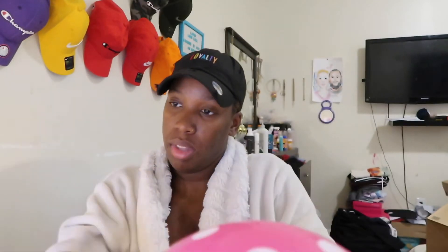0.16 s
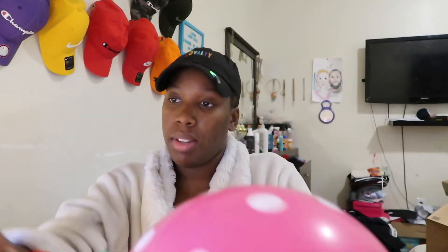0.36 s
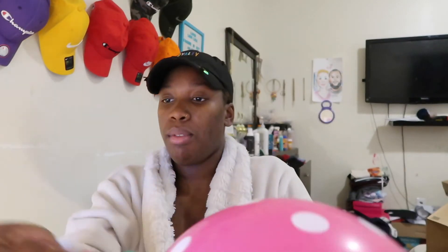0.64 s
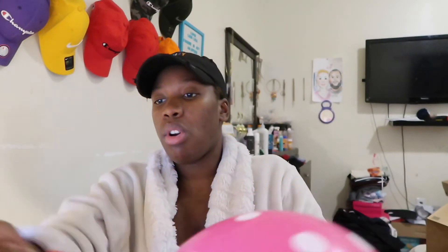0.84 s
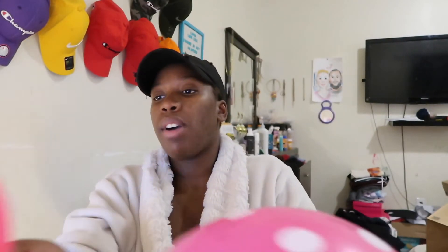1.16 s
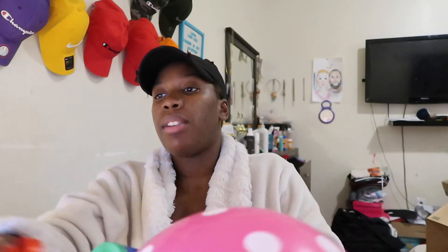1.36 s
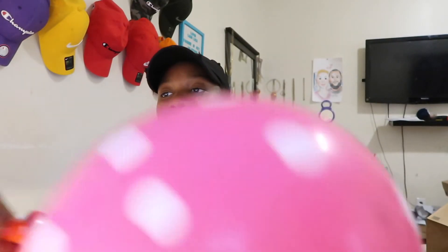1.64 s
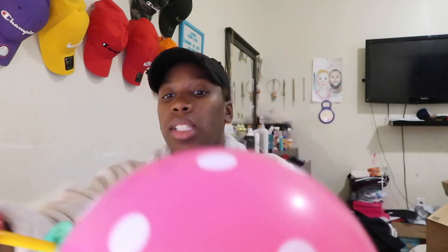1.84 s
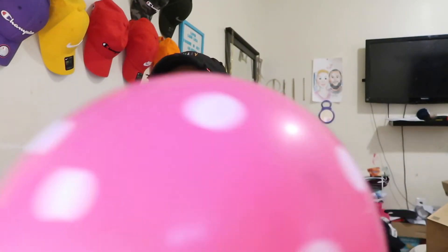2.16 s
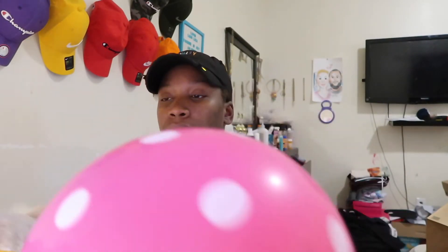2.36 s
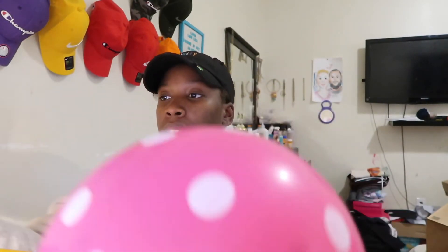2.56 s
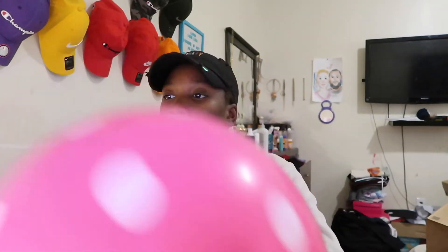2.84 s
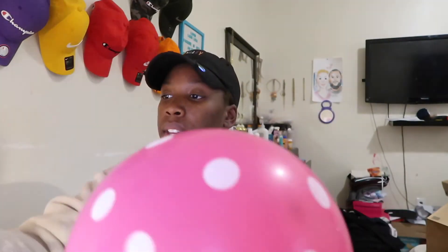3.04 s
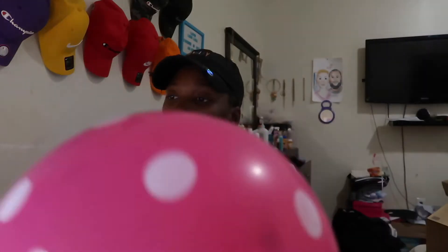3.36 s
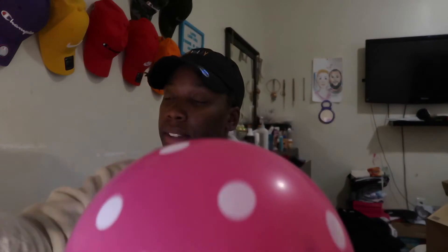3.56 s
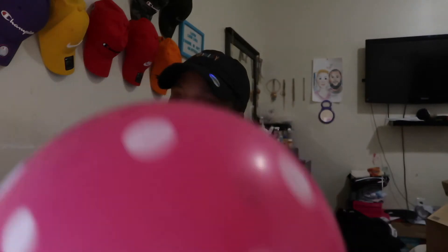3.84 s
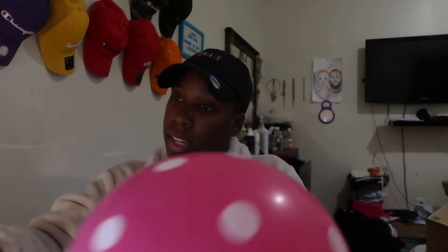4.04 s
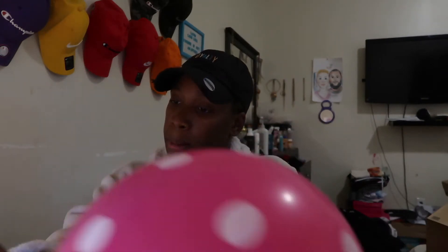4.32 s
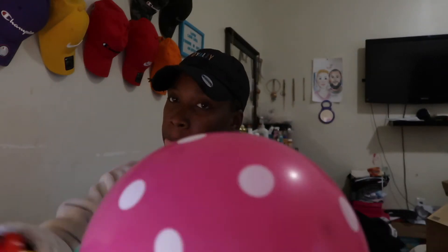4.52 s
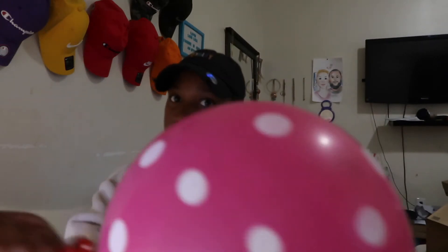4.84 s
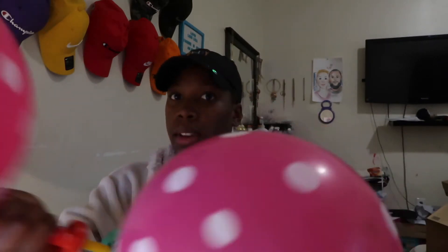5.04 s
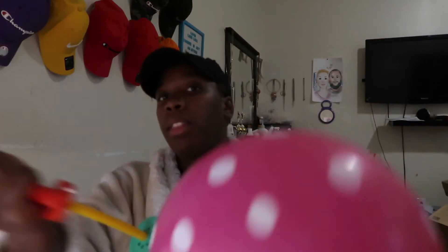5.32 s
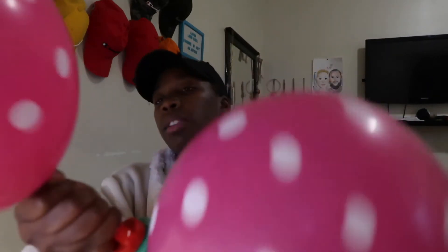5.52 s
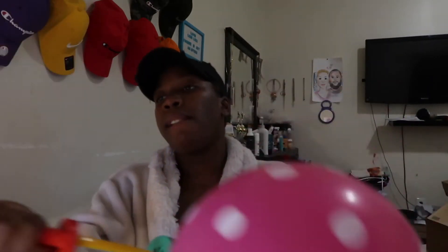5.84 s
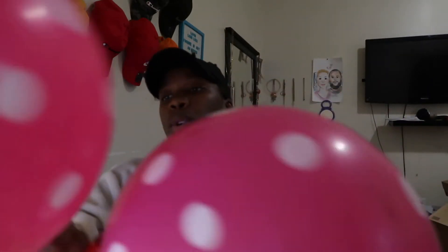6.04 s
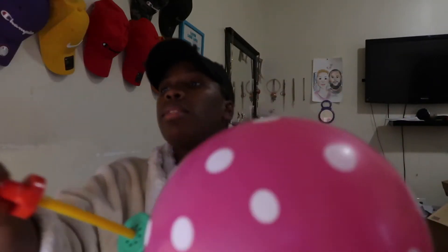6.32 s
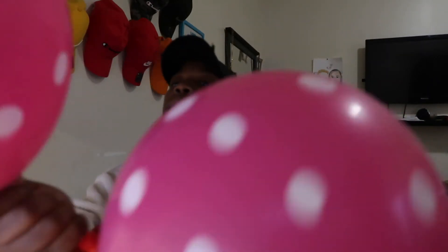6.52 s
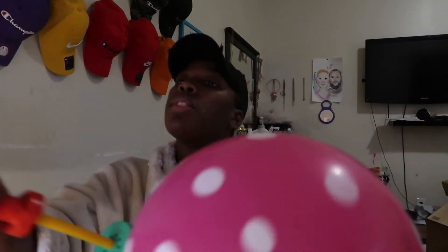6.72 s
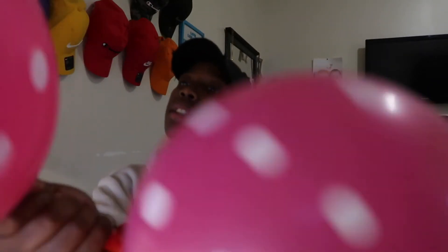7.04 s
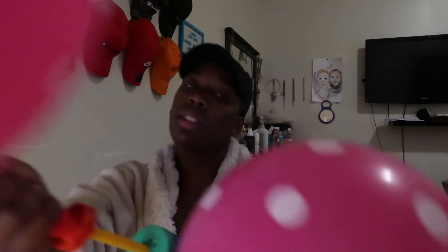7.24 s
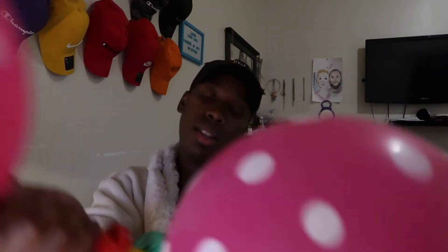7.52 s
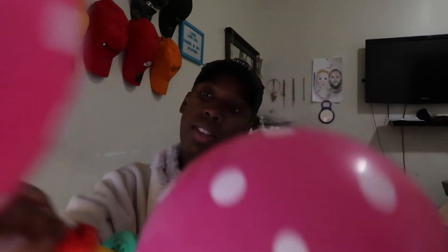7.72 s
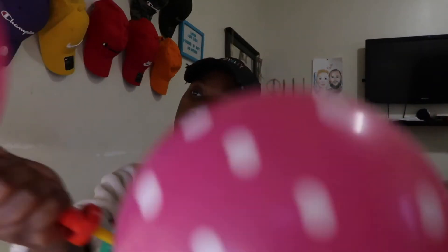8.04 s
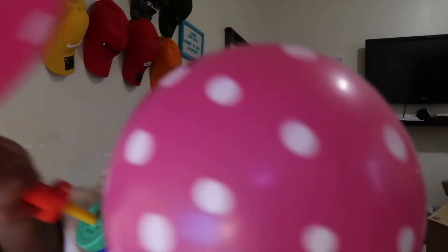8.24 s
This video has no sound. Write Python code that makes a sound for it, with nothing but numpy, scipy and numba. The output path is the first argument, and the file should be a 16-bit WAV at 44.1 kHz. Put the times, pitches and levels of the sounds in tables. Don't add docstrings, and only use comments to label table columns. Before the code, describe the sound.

Quick even pump strokes push rasping air into a balloon, each ending in a hollow plastic thump and a valve clack, indoors.

```python
import sys
import numpy as np
from scipy import signal
from scipy.fft import rfft, irfft, next_fast_len
from scipy.io import wavfile
from scipy.ndimage import uniform_filter1d
from numba import njit

SR = 44100
rng = np.random.default_rng(int(sys.argv[2]) if len(sys.argv) > 2 else 0)


def unload_audio(sound):
    columns = np.transpose(np.atleast_2d(sound))
    steps = np.round(np.clip(columns, -1, 1) * 32767)
    wavfile.write(sys.argv[1], SR, steps.astype(np.int16))


def voltage_ratio(decibels):
    exponent = np.asarray(decibels, float) / 20
    return 10 ** exponent


N = 369558
SIZE = next_fast_len(N + SR)
HZ = np.arange(SIZE // 2 + 1) * SR / SIZE
TIME = np.arange(N) / SR

# (valve flap [s], piston stop [s], hiss [dB], flap [dB], thump [dB])
PUSH_STROKES = [(0.091, 0.255, -23, -19.5, -13), (0.572, 0.739, -22, -15, -14),
                (1.043, 1.216, -22.5, -19.5, -13.5), (1.544, 1.71, -22.5, -15.5, -12.5),
                (2.055, 2.232, -24, -17.5, -14), (2.578, 2.75, -24.5, -16.5, -13),
                (3.117, 3.295, -25.5, -16.5, -14.5), (3.65, 3.837, -26, -18, -13),
                (4.208, 4.41, -25, -14.5, -21), (4.739, 4.923, -24, -19, -14),
                (5.313, 5.494, -22.5, -18, -14.5), (5.85, 6.03, -24, -19.5, -15.5),
                (6.359, 6.522, -21, -23, -14.5), (6.883, 7.054, -22, -22, -13),
                (7.431, 7.617, -22, -23, -14), (7.963, 8.142, -23.5, -17, -15.5)]
# (valve flap [s], end of travel [s], hiss [dB], flap [dB], flap ring [Hz])
PULL_STROKES = [(-0.17, 0.044, -31, -16, 1110), (0.327, 0.524, -28, -14, 1120),
                (0.796, 0.993, -25.5, -18, 985), (1.292, 1.489, -27.5, -16.5, 1150),
                (1.792, 1.998, -28.5, -14, 1190), (2.288, 2.508, -30, -15, 960),
                (2.827, 3.046, -30.5, -15.5, 1130), (3.36, 3.571, -28, -16.5, 980),
                (3.928, 4.14, -27.5, -14.5, 1110), (4.454, 4.668, -29, -15, 945),
                (5.015, 5.236, -27.5, -15.5, 1014), (5.577, 5.781, -26.5, -17, 1090),
                (6.091, 6.296, -28.5, -18.5, 1100), (6.615, 6.82, -27, -15.5, 1136),
                (7.152, 7.36, -23.5, -12.5, 1110), (7.696, 7.904, -26.5, -14, 1100),
                (8.209, 8.404, -26.5, -13, 1120)]
# (frequency [Hz], level [dB], t60 [s])
BALLOON_MODES = [(87, -21, 0.46), (127.3, -10.5, 0.34), (195.2, -3, 0.078), (278, -12, .12)]


def along(table):
    hz, value = np.transpose(table)
    return np.interp(np.log(HZ + 1), np.log(hz + 1), value)


def shape(x, gain):
    return irfft(rfft(x, SIZE) * gain, SIZE)[..., :N]


def unit(x):
    return x / np.sqrt(np.mean(x ** 2))


def noise():
    return rng.standard_normal(N)


def walk(rate):
    hold = int(SR / rate)
    levels = np.repeat(rng.standard_normal(N // hold + 1), hold)
    return 1.29 * uniform_filter1d(levels, hold)[:N]


def bump(start_s, length_s):
    return np.sin(np.pi * np.clip((TIME - start_s) / length_s, 0, 1)) ** 2


def add(out, s, x):
    i = int(s * SR)
    out[i:i + len(x)] += x[:N - i]


@njit
def svf(x, hz, width):
    y, band, low = np.empty(len(x)), 0., 0.
    for i in range(len(x)):
        g, k = np.tan(np.pi * hz[i] / SR), width / hz[i]
        v = (band + g * (x[i] - low)) / (1 + g * (g + k))
        band, low, y[i] = 2 * v - band, low + 2 * g * v, k * v
    return y


def ring(modes, contact_s, scatter_db=1.77, detune=0.035):
    t = TIME[:int(SR * max(t60 for _, _, t60 in modes))]
    chance = rng.standard_normal((len(modes), 2))
    out = np.zeros(len(t))
    for k, ((hz, db, t60), (louder, sharper)) in enumerate(zip(modes, chance)):
        phase = np.pi / 2 * (k % 2)
        decay = voltage_ratio(db + scatter_db * louder - 60 * t / t60)
        out += decay * np.sin(2 * np.pi * hz * (1 + detune * sharper) * t + phase)
    push = np.hanning(int(contact_s * SR) + 3)
    return np.convolve(out, push / push.sum())


def flow(strokes, rule):
    jet = np.zeros(N)
    lag_s, swell_s, fade_db, typical_db, overrun_s = rule
    for flap, end, db in strokes:
        start, stop = flap + lag_s, end + overrun_s
        full = start + swell_s
        t = TIME[max(int(start * SR), 0):int((stop + .02) * SR)]
        swell = np.sin(np.pi / 2 * np.clip((t - start) / (full - start), 0, 1)) ** 1.57
        fade = fade_db - 0.6 * (db - typical_db)
        sag = voltage_ratio(db + fade * np.clip((t - full) / (stop - full), 0, 1) ** 2)
        cut = np.clip((stop - t) / 0.0078 + .5, 0, 1)
        add(jet, max(start, 0), swell * sag * cut)
    return jet, jet * voltage_ratio(2 - 0.3946 * TIME)


def hiss(flows, column, jet_db, column_db, boom_db):
    # (frequency [Hz], density [dB per Hz])
    jet_spectrum = [(200, -15.5), (800, -10.5), (2000, -6.5), (4500, -5.5), (6000, -4.5), (7500, -2),
                    (10000, -3), (12500, -8), (14500, -13), (16000, -32)]
    skin_tilt_db = (3, 3.5, -5, 0)
    jet, barrel = flows
    eddies = voltage_ratio(1.37 * walk(150) + 0.58 * walk(30))
    air = unit(shape(noise(), voltage_ratio(along(jet_spectrum)))) * jet * eddies * voltage_ratio(jet_db)
    for hz, width, db in column:
        centre = hz * (1 + 0.038 * walk(8))
        tone = unit(svf(noise(), centre, width * 1.)) * voltage_ratio(db + 2.0 * walk(25))
        air += tone * barrel * eddies * voltage_ratio(column_db)
    shake = noise() * barrel * voltage_ratio(4.5 * walk(12))
    skin = np.zeros(N)
    for (hz, db, _), tilt_db in zip(BALLOON_MODES, skin_tilt_db):
        skin += voltage_ratio(db + tilt_db) * svf(shake, hz * (1 + 0.092 * walk(4)), 20.8)
    return air + skin * voltage_ratio(boom_db)


def push_hiss():
    # (start after flap [s], swell [s], fade at typical level [dB], typical level [dB], run past stop [s])
    rule = (0.004, 0.1069, -7, -20, 0.02)
    # (frequency [Hz], width [Hz], level [dB])
    column = [(1290, 140, -8.5), (1662, 220, -2.5), (2270, 200, -3.5), (2710, 260, -2), (3410, 200, 1.5),
              (4090, 300, -1.5)]
    strokes = []
    for flap, stop, db, _, thump_db in PUSH_STROKES:
        early_s = 0.006 * min(thump_db + 14, 0)
        strokes.append((flap, stop + early_s, db))
    return hiss(flow(strokes, rule), column, 0.69, -12.5, 11.4)


def pull_hiss():
    # (start after flap [s], swell [s], fade at typical level [dB], typical level [dB], run past stop [s])
    rule = (0.0059, 0.0842, -6.5, -27.5, 0.0108)
    # (frequency [Hz], width [Hz], level [dB])
    column = [(840, 270, -5.5), (1294, 150, -3), (1633, 230, -1.5), (2196, 260, -4), (2710, 240, -1),
              (3390, 300, -2.5)]
    strokes = [row[:3] for row in PULL_STROKES]
    return hiss(flow(strokes, rule), column, 0.56, -10.0, 10.7)


def spurts():
    size = np.zeros(N)
    for flap, _, db, *_ in PUSH_STROKES:
        size += voltage_ratio(db - 21.5) * bump(flap + 0.011, 0.053)
    fizz = shape(noise(), 1 / (1 + (10800 / (HZ + 1)) ** 12))
    return unit(fizz) * size * np.array([[1], [-1]])


def stops(hits, boom_db, knock_db, handle_db):
    # (frequency [Hz], level [dB], t60 [s])
    barrel = [(376.3, -2, 0.077), (448, -0.5, 0.032), (582, 0.5, 0.022), (638, -7.5, 0.019),
              (970, -19, 0.016), (1284, -18, .05)]
    crack = [(2010, -2, 0.0075), (2770, 1, 0.0087), (3530, 1, 0.012), (4500, -5, 0.0053)]
    handle = [(1263, 0, 0.074), (1330, -9.5, .03)]
    out = np.zeros(N)
    for s, db, crack_db in hits:
        add(out, s + 0.0012, voltage_ratio(db + boom_db) * ring(BALLOON_MODES, 0.0016, scatter_db=2.0, detune=0.062))
        add(out, s + 0.00095, voltage_ratio(db + knock_db) * ring(barrel, 0.00053))
        add(out, s + .0005, voltage_ratio(db + crack_db + 4.5) * ring(crack, .0001, detune=0.068))
        add(out, s + 0.00144, voltage_ratio(db + crack_db + handle_db) * ring(handle, 0.00015, detune=0.0095))
        add(out, s + .012, voltage_ratio(db + crack_db - 9.5) * ring(crack, .0001, detune=0.082))
    return out


def push_stops():
    cracks_db = -8 + 1.5 * rng.standard_normal(len(PUSH_STROKES))
    hits = [(row[1], row[4], db) for row, db in zip(PUSH_STROKES, cracks_db)]
    return stops(hits, -3, -1.9, -7.5)


def pull_stops():
    # (time [s], thump [dB], crack [dB])
    hits = [
        (0.018, -18.5, -2),
        (0.988, -20, -2.5),
        (2.518, -23, -9),
        (3.042, -20, 0),
        (3.569, -20, -2.5),
        (4.166, -25.5, -9),
        (4.702, -31, -8),
        (5.226, -20.5, 6),
    ]
    return stops(hits, 0.46, -4.5, -4)


def flaps(turns, chamber, t60, bounce_s, lift_db, tick_db, bounce_db):
    # (frequency [Hz], level [dB], t60 [s])
    tick = [(1800, -1, 0.005), (2430, 1.5, 0.0079), (3180, -6, 0.0056)]
    out = np.zeros(N)
    for s, db, hz in turns:
        modes = [(hz, 0, t60)] + chamber
        add(out, s - .007, voltage_ratio(db + lift_db) * ring(tick, .0001, detune=.08))
        add(out, s + 0.001014, voltage_ratio(db + tick_db) * ring(tick, .0001))
        add(out, s + 0.001003, voltage_ratio(db - 3) * ring(modes, 0.0003, detune=0.032))
        add(out, s + .001 + bounce_s, voltage_ratio(db + bounce_db) * ring(modes, 0.00049, detune=0.02))
    return out


def flaps_after_push():
    # (frequency [Hz], level [dB], t60 [s])
    chamber = [(280, -12.5, 0.019), (472, -8.5, 0.02), (666, -3, 0.04), (1196, -6, 0.025),
               (1670, -14, .012)]
    turns = [(row[0], row[3], row[4]) for row in PULL_STROKES[1:]]
    return flaps(turns, chamber, 0.026, .0036, -34, -18, -7)


def flaps_after_pull():
    # (frequency [Hz], level [dB], t60 [s])
    chamber = [(287, -10.5, 0.016), (480, -9, 0.013), (736, -4, 0.011), (1150, -4.5, 0.021),
               (1600, -8.5, 0.014), (2210, -4.5, 0.016)]
    turns = [(row[0], row[3], 610) for row in PUSH_STROKES]
    return flaps(turns, chamber, 0.027, 0.00361, -15, -5.5, -10.5)


def rubs():
    # (time [s], length [s], level [dB])
    drags = [
        (0.15, 0.11, -34),
        (0.66, 0.089, -37),
        (1.127, 0.12, -38),
        (2.68, 0.088, -35),
        (5.62, 0.12, -46),
        (7.113, 0.24, -34.5),
        (7.52, 0.093, -39),
    ]
    size = sum(voltage_ratio(db) * bump(s, length) for s, length, db in drags)
    skin = sum(svf(noise(), hz * (1 + 0.069 * walk(9)), hz / 4) for hz in (135., 175., 270.))
    return unit(skin) * size * voltage_ratio(3.2 * walk(25))


def room(x, t60_low, t60_high, wet_db):
    # (frequency [Hz], level [dB])
    unshared = [(100, -60), (200, -26), (500, -15.5), (1500, -27.5), (3000, -3), (5000, 4.5), (16000, -23)]
    t = TIME[:SR // 2]
    tails = rng.standard_normal((2, 2, len(t))) * np.clip(t / 0.0036 - 1, 0, 1)
    low, high = (rfft(tail * 1000. ** (-t / t60), SIZE) / np.sqrt(t60 * SR / 14)
                 for tail, t60 in zip(tails, (t60_low, t60_high)))
    treble = 1 / (1 + (1500 / (HZ + 1)) ** 2)
    shared, split = low * (1 - treble) + high * treble
    sides = voltage_ratio(along(unshared)) * split * np.array([[1], [-1]])
    return shape(x, voltage_ratio(wet_db) * (shared + sides))


def room_tone():
    # (frequency [Hz], density [dB per Hz])
    spectrum = [(25, 10), (60, -2), (125, 4.5), (300, -9.5), (1000, -3), (3000, -10), (9000, -18),
                (16000, -40)]
    return unit(shape(noise(), voltage_ratio(along(spectrum)))) * voltage_ratio(-42.0 + 2.6 * walk(3.07))


def scene():
    pump = push_hiss() + pull_hiss()
    pump += push_stops() + pull_stops()
    pump += flaps_after_push() + flaps_after_pull()
    pump += rubs()
    return pump + spurts() + room(pump, 0.38, 0.28, -7) + room_tone()


def low_pass(x):
    return signal.sosfilt(signal.butter(12, 15950, fs=SR, output="sos"), x)


def record(dry):
    # (frequency [Hz], phase [rad])
    port_lead = [(0, -1), (1000, 0.14), (1500, 0.13), (2500, 0.32), (3500, 1.14), (4650, 1.5), (6700, 1.84),
                 (8700, 2.5), (11400, 2.5), (16000, 3)]
    rumble_cut = (1j * HZ / (40 + 1j * HZ)) ** 2
    tilt = voltage_ratio(.5 * np.exp(-np.log((HZ + 1) / 2800) ** 2))
    phase = np.clip(along(port_lead), 0, np.pi) * np.clip(HZ / 800, 0, 1)
    lead = tilt * np.exp(.5j * phase)
    ports = shape(dry, rumble_cut * np.array([lead, 1 / lead]))
    return low_pass(ports)


dry = scene()
out = record(dry)
unload_audio(out)
```